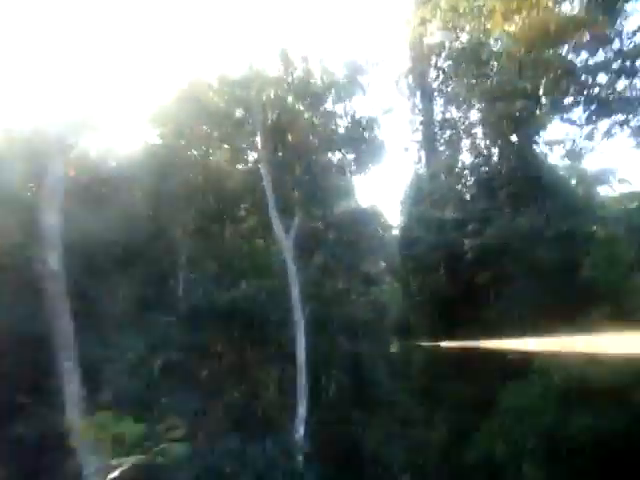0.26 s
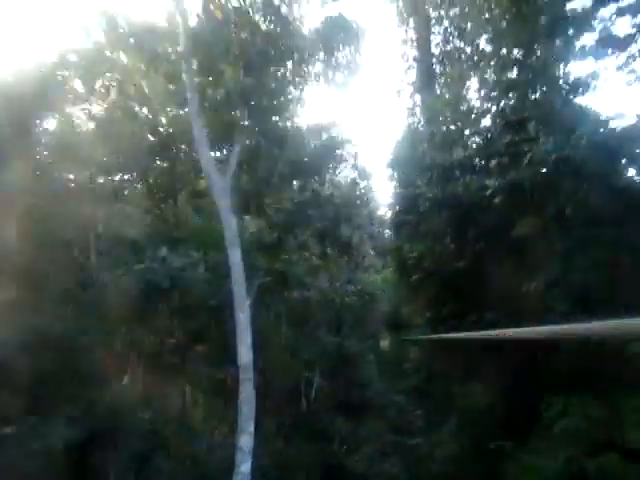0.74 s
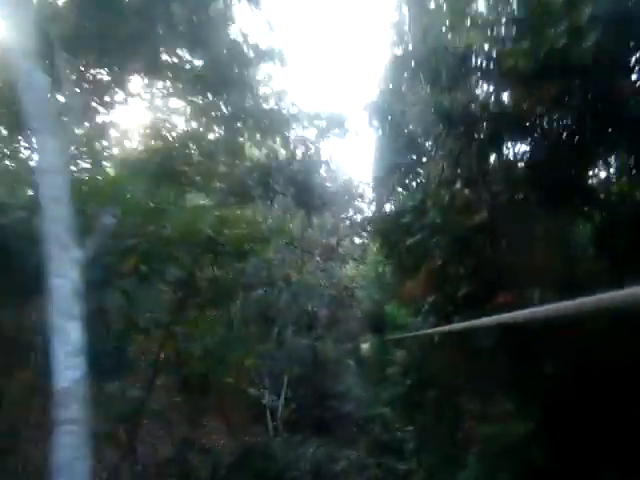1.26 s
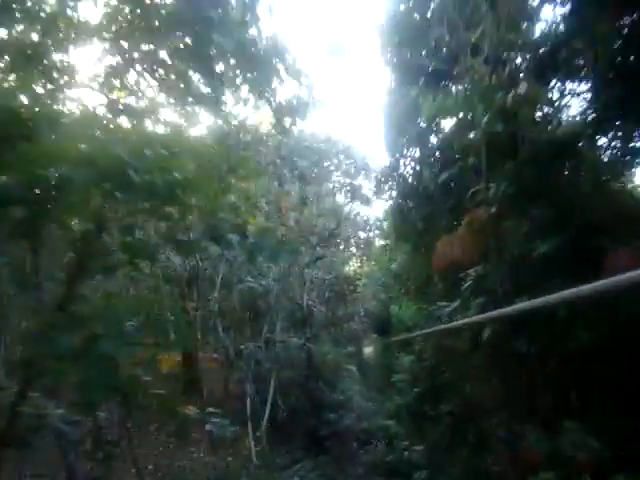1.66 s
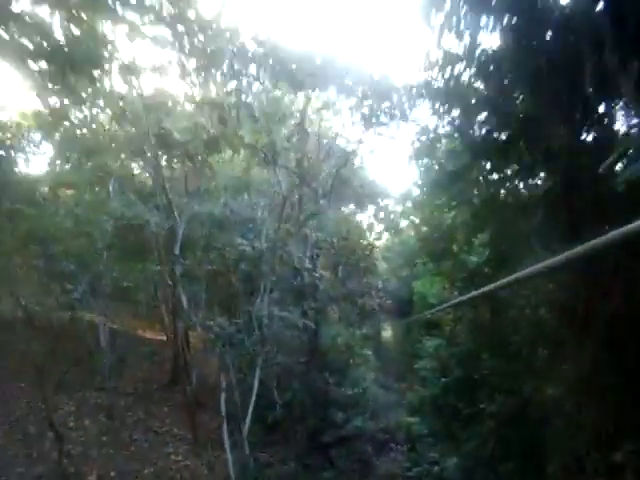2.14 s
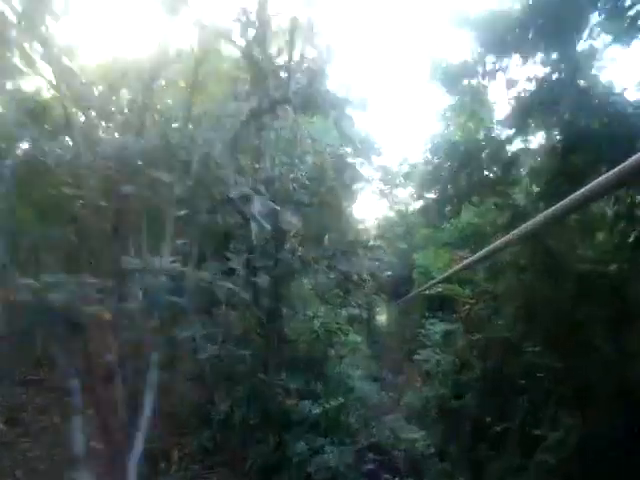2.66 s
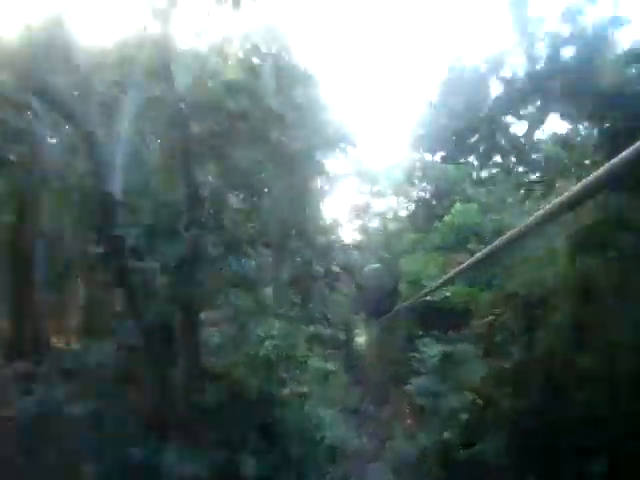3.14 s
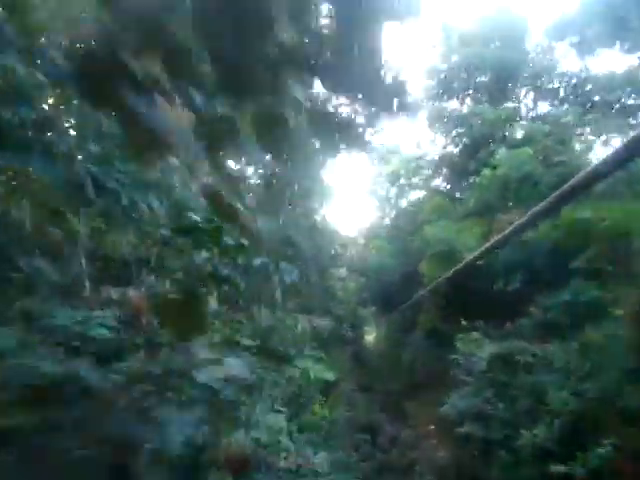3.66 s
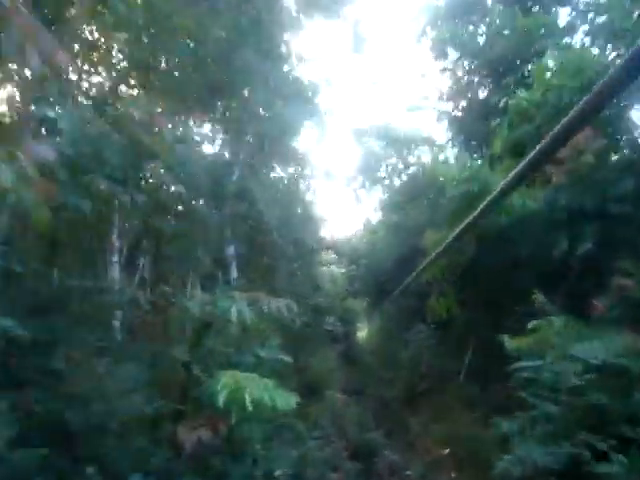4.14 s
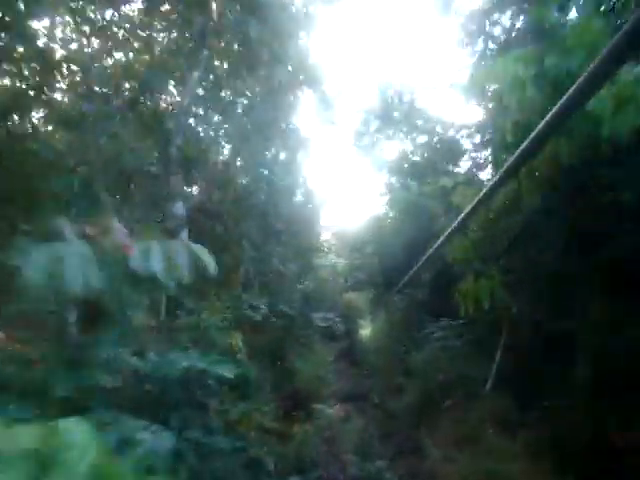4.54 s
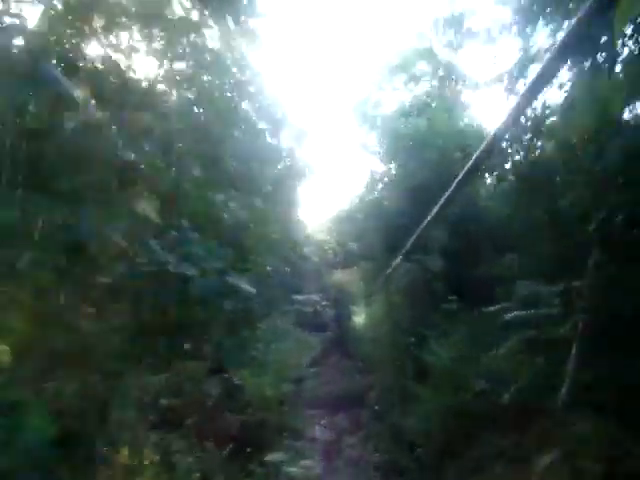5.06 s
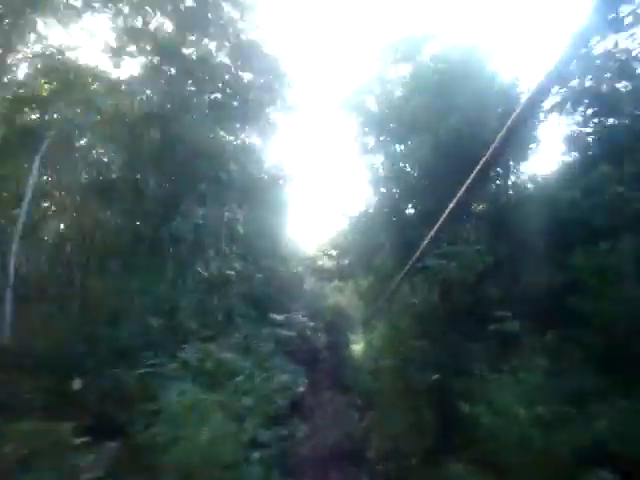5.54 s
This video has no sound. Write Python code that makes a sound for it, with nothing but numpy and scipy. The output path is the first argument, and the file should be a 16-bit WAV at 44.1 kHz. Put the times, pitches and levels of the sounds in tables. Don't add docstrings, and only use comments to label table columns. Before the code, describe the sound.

A zip line ride through a forest, heard from the rider's small camera close to the trolley. From 0 s the wheels are already rolling loudly on twisted steel cable: a dense, gritty metallic hiss with a piercing ring around three kilohertz. Within it a buzzing harmonic whine begins near 490 hertz and climbs smoothly, by around 5.8 s reaching about 670, with tiny surges and trembling. Until about 1.3 s the tone is full and shrill; around 1.4 to 1.6 s the colour shifts as the rider swings, and from 2.4 s a higher, thinner ring near five kilohertz stands out. After 3.5 s the lower ringing weakens, leaving more hiss and exposing the whine. Low, muffled wind buffeting stays beneath, lightest around 2 to 3 s, swelling after 4.2 s and strongest near 5.25 s. Dry, mono, slightly overloaded, with watery, clipped-off treble. The rolling never stops.

```python
import sys
import numpy as np
from scipy import signal
from scipy.fft import rfft, irfft, next_fast_len
from scipy.io import wavfile
from scipy.ndimage import uniform_filter1d, map_coordinates

SR = 44100
rng = np.random.default_rng(int(sys.argv[2]) if len(sys.argv) > 2 else 0)


def magnitude_from_level(level_db):
    exponent = np.asarray(level_db, float) / 20
    return 10 ** exponent


def digitize_waveform(pressure):
    field = np.atleast_2d(pressure).T
    bounded = np.clip(field, -1, 1)
    quanta = np.round(bounded * 32767).astype(np.int16)
    wavfile.write(sys.argv[1], SR, quanta)


N = 255339

START_HZ, TERMINAL_HZ, GAIN_S = 482.2, 839, 8.018
# time_s, extra_hz
SURGES = [(.11, 7.745), (0.246, 6.61), (.473, 8.38), (.757, 10.51), (1.11, 9.81), (1.293, 3.59),
          (1.413, 4.96), (1.65, 8.74), (1.911, 6.8), (2.057, 7.68), (2.183, 3.4), (2.285, 4.27),
          (2.503, 9.25), (2.725, 7.8), (2.98, 5.73), (3.192, 6.73), (3.477, 8.37), (3.64, 6.09),
          (3.799, 5.49), (4.002, 7.33), (4.25, 2.14), (4.532, 7.34), (4.706, 6.46), (4.981, 6.88),
          (5.163, 6.44), (5.433, 3.5), (5.656, 4.9)]
SURGE_S = 0.052
# centre_hz, half_width_hz, level_db
CABLE_RESONANCES = [(479, 25, -35.5), (560, 23, -36.5), (617, 90, -36.5), (1020, 51, -27), (1103, 78, -29),
                    (1634, 97, -30), (1762, 49, -36), (2000, 55, -32.5), (2200, 76, -30.5),
                    (2477, 32, -33.5), (2593, 70, -32), (2770, 40, -34), (2990, 74, -31.5),
                    (3200, 140, -32)]
CLEAN_MULTIPLES = 5
LAY_MULTIPLES = [6, 7, 7 / 6, 8 / 6, 13 / 6, 19 / 6, 25 / 6]
LAY_DB = [-42, -34.5, -54, -52, -54, -41, -45]

POSES = 4
# time_s, pose, nearness_db, tilt_towards_cable_db
SWING = [(0, 0, 0.5, 0), (.5, -0.5, 0, -.5), (.9, 0, 0, 0.5), (1.26, 0.77, 0, 1.5), (1.42, 1, 0.1, -1),
         (1.54, 1, 0, .5), (1.64, 1.1, -0.2, 0), (1.88, 1.5, 1.1, 0.3), (2.2, 1.5, -0.1, .5),
         (2.42, 2, 0.2, 0), (2.6, 2, 0.1, -.5), (3.2, 2.5, 0, -1), (3.7, 2.5, 0.44, -2), (4.3, 3, -0.2, 0),
         (4.62, 2.8, -0.1, 0), (4.9, 3, 0.25, .5), (5.6, 3, 0.5, 1.5), (5.79, 3, 0, 1)]
MODE_HZ = [790, 1690, 1980, 2445, 2612, 3222, 3675, 3770, 4636, 4866, 5495, 5620, 6040, 6650, 6995, 7170,
           7331, 7900, 8058, 8775, 8950, 9110]
# width_hz, pose0_db, pose1_db, pose2_db, pose3_db
MODE_LEVELS = [(183, -21.5, -23, -25, -33), (47, -11, -12, -19, -32), (128, -22.5, -12, -14, -20),
               (15.2, -2, -7, -9, -22), (72, -7, -5.5, -12.5, -13.5), (16.8, 4.5, 3, 0, -10.5),
               (78.5, -10, -11, -5.5, -11), (109, -5.5, -4.5, -26, -18), (71, -11, -13.5, -6, -3.5),
               (18.5, -4, -0.5, 4, 1), (96, -13.5, -18, -10.5, -12), (61, -15.5, -6.5, -23.5, -9),
               (117, -10, -10.5, -17, -11.5), (90, -18.5, -8.5, -24, -19.5), (60, -23, -10, -19, -16.5),
               (61, -16, -6, -12, -6), (35.8, -11, -5, -10, -25), (50, -32, -26, -6, -13),
               (71, -10.5, -21, -7.5, -14.5), (80, -15, -23, -13.5, -18), (46, -12.5, -22, -17.5, -16),
               (33, -23, -18, -5.5, -15)]
# frequency_hz, pose0_db, pose1_db, pose2_db, pose3_db
HISS = [(300, -65, -66, -66.5, -67), (557, -39, -39.5, -52, -52), (968, -20, -20.5, -22, -36),
        (1430, -32, -34, -36, -30), (1800, -19, -24, -22, -28.5), (2370, -25, -31, -20.5, -25),
        (2820, -17, -19, -16.5, -18), (4230, -17.5, -16.5, -21.5, -22), (5340, -14.5, -18.5, -24, -13.5),
        (6200, -27, -12.5, -16, -20.5), (7500, -17, -31, -21.5, -17), (8730, -20, -17, -18, -17),
        (9600, -29, -32, -32, -20), (11000, -25.5, -25.5, -32.5, -24)]
RANGE_EDGES_HZ = [0, 4300, 5100, 7500, SR]
# frame_db, wheel_rim_db, hiss_db, top_hiss_db
POSE_LEVELS = [(-17.5, -23, -20.5, -24.5), (-17.4, -23, -20.5, -22.5), (-21.5, -19.5, -23.5, -21.5),
               (-25, -22.5, -21.5, -24)]
TILT_SHARE = np.array([[-.1], [-.7], [.3], [1.05]])
WAVER_DB = np.array([[.3], [.6], [.25], [.35]])

# time_s, level_db
GUSTS = [(0, -46.5), (.3, -49), (1.6, -49), (2, -53), (2.4, -50), (2.75, -54), (3.1, -49), (3.6, -49.5),
         (4.2, -44.5), (4.5, -48), (4.8, -42.5), (5.25, -41), (5.5, -43.5), (5.79, -44.5)]
# frequency_hz, level_db
BUFFET = [(20, -48), (50, -35.5), (100, -20), (200, -7.5), (350, -1), (550, -3.5), (900, -6.5), (1600, -29),
          (4000, -58.5)]
# frequency_hz, level_db
RUMBLE = [(20, -32), (50, -23), (120, -4), (200, -2.5), (300, -0.5), (600, -39)]
# frequency_hz, level_db
BAND_EDGE = [(10000, 0), (10060, -6), (10120, -15), (10160, -28), (10200, -60), (10240, -120)]


def unit(x):
    return x / np.sqrt(np.mean(x ** 2) + 1e-20)


def curves(rows):
    s, *cols = np.transpose(rows)
    return [np.interp(np.arange(N) / SR, s, c) for c in cols]


def along(points, hz):
    f, *cols = np.transpose(points)
    return np.array([np.interp(np.log(hz + 1), np.log(f + 1), c) for c in cols])


def wobble(rate):
    knots = rng.standard_normal(int(N * 200 / SR) + 4)
    return map_coordinates(knots, [np.arange(N) * min(rate, 200) / SR])


def filtered(x, response):
    m = next_fast_len(N + SR // 2)
    return irfft(rfft(x, m) * response(np.fft.rfftfreq(m, 1 / SR)), m)[..., :N]


def patchy(depth_db, tall, wide):
    z = signal.stft(rng.standard_normal(N), nperseg=512)[2]
    field = rng.standard_normal(z.shape)
    field = uniform_filter1d(field, tall, 0)
    field = uniform_filter1d(field, wide, 1)
    return unit(signal.istft(z * magnitude_from_level(depth_db * unit(field)), nperseg=512)[1][:N])


def strand_crossings():
    t = np.arange(N) / SR
    rate = TERMINAL_HZ - (TERMINAL_HZ - START_HZ) * np.exp(-t / GAIN_S)
    rate = rate + sum(hz * np.exp(-.5 * ((t - s) / SURGE_S) ** 2) for s, hz in SURGES)
    return np.cumsum(rate + 1.19 * wobble(25)) / SR, rate


def cable_response(f):
    return np.sqrt(sum((magnitude_from_level(db) / (1 + ((f - c) / w) ** 2)) ** 2 for c, w, db in CABLE_RESONANCES))


def whine(count, rate):
    lines = [(k, cable_response(k * rate)) for k in range(1, CLEAN_MULTIPLES + 1)]
    speed_db = 60 * np.log10(rate / rate.max())
    lines += [(k, magnitude_from_level(db + speed_db)) for k, db in zip(LAY_MULTIPLES, LAY_DB)]
    total = 0
    for k, gain in lines:
        flutter = magnitude_from_level(0.27 * k * wobble(30))
        phase = 2 * np.pi * k * count + 0.14 * k * wobble(60)
        total = total + np.sqrt(2) * gain * flutter * np.sin(phase)
    return total


def body_response(f):
    peaks = 0
    for c, (w, *db) in zip(MODE_HZ, MODE_LEVELS):
        mode = (f * w) ** 2 / ((c * c - f * f) ** 2 + (f * w) ** 2)
        peaks = peaks + magnitude_from_level([db]).T ** 2 * mode
    return np.sqrt(peaks + magnitude_from_level(along(HISS, f)) ** 2)


def rolling(count):
    grit = patchy(0.51, tall=8, wide=4) * (1 + 0.24 * np.sin(2 * np.pi * count))
    pose, near_db, tilt_db = curves(SWING)
    pose = np.clip(pose, 0, POSES - 1)
    share = np.clip(1 - abs(pose - np.arange(POSES)[:, None]), 0, 1)
    sound = (share * filtered(grit, body_response)).sum(axis=0)
    edge = np.array(RANGE_EDGES_HZ)[:, None]
    parts = filtered(sound, lambda f: (f >= edge[:-1]) & (f < edge[1:]))
    slow = np.sqrt(abs(uniform_filter1d(parts ** 2, SR // 7)))
    level_db = np.transpose(POSE_LEVELS) @ share + near_db + TILT_SHARE * tilt_db
    level_db = level_db + WAVER_DB * np.array([wobble(7) for _ in parts])
    level_db = level_db + 0.28 * wobble(22)
    return (magnitude_from_level(level_db) * parts / slow).sum(axis=0)


def wind():
    rush = filtered(patchy(1.65, tall=3, wide=5), lambda hz: magnitude_from_level(along(BUFFET, hz)[0]))
    shake = filtered(patchy(2, tall=1, wide=9), lambda hz: magnitude_from_level(along(RUMBLE, hz)[0]))
    gust_db, = curves(GUSTS)
    low = magnitude_from_level(-56.0 + 1.4 * wobble(4.6)) * unit(shake)
    low = magnitude_from_level(0.26 * (gust_db - gust_db.mean())) * low
    return magnitude_from_level(gust_db + 4.0 + 0.46 * wobble(10)) * unit(rush) + low


def masked_dropouts(x, margin_db, from_hz):
    hz, _, z = signal.stft(x, SR, nperseg=384)
    bands = (abs(z[:192]) ** 2).reshape(64, 3, -1).sum(axis=1)
    usual = uniform_filter1d(bands, size=41, axis=1)
    mask = np.sqrt(usual * uniform_filter1d(usual, size=3, axis=0))
    mute = (bands < mask * magnitude_from_level(-margin_db) ** 2) & (hz[:192:3, None] > from_hz)
    z[:192] *= np.where(np.repeat(mute, 3, axis=0), magnitude_from_level(-20), 1)
    return signal.istft(z, SR, nperseg=384)[1][:N]


def scene():
    count, rate = strand_crossings()
    return (whine(count, rate) + rolling(count) + wind())[None]


def roll_off(x):
    return signal.sosfilt(signal.butter(12, 10280, fs=SR, output="sos"), x)


def record(dry):
    soft = dry / (1 + abs(dry / .95) ** 4) ** (1 / 4)
    thinned = masked_dropouts(soft[0], margin_db=5.2, from_hz=5000)[None]
    limited = filtered(thinned, lambda hz: magnitude_from_level(along(BAND_EDGE, hz)[0]))
    return roll_off(limited)


dry = scene()
out = record(dry)
digitize_waveform(out)
```